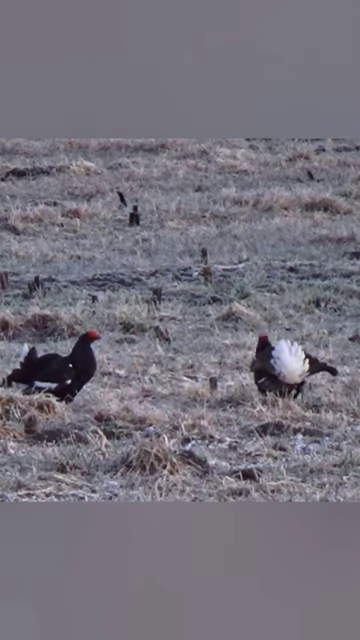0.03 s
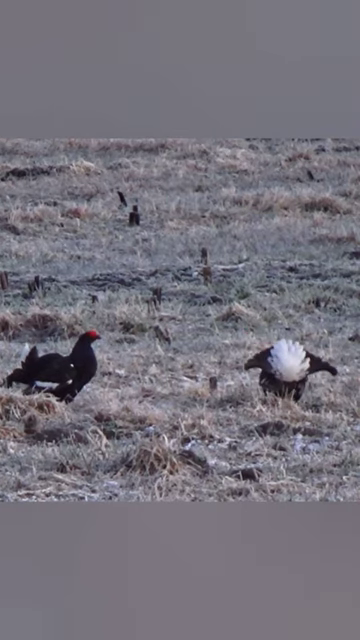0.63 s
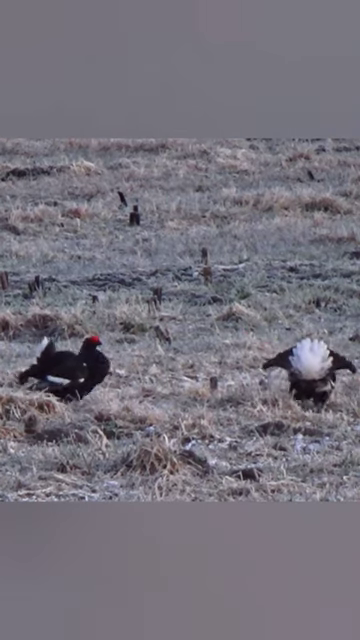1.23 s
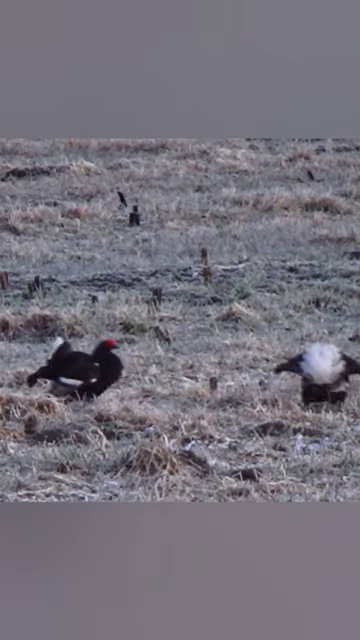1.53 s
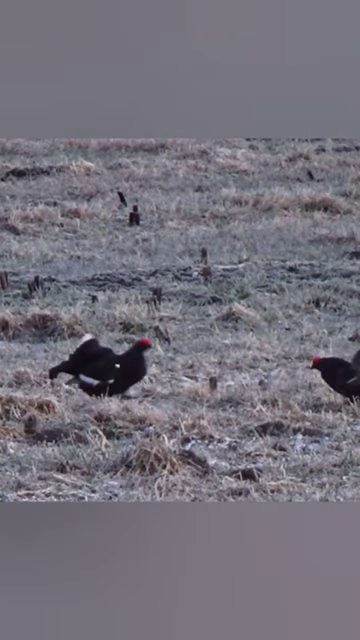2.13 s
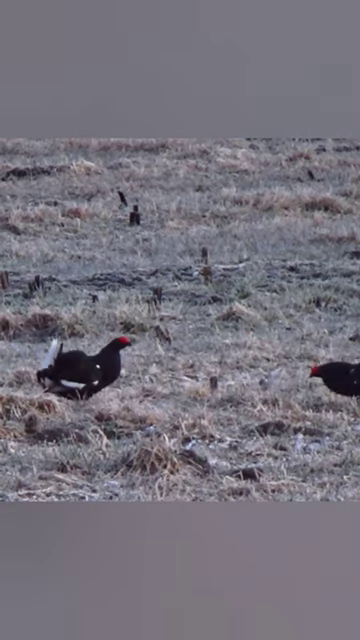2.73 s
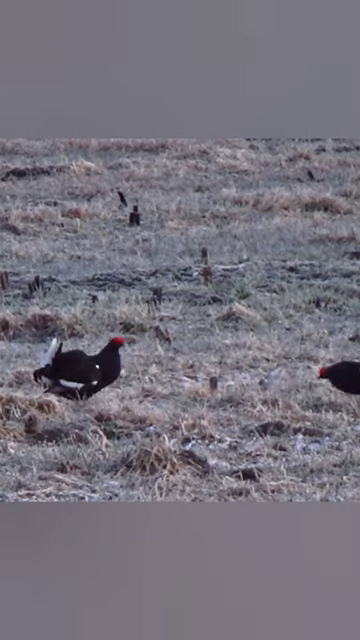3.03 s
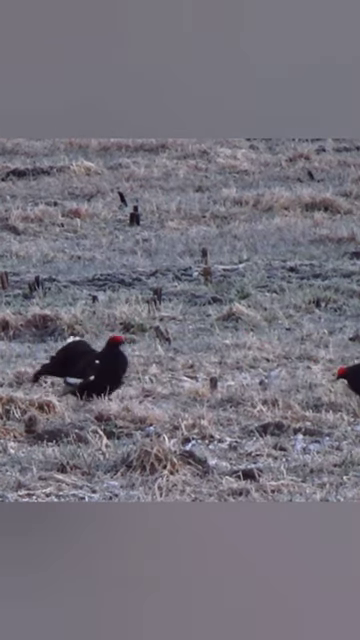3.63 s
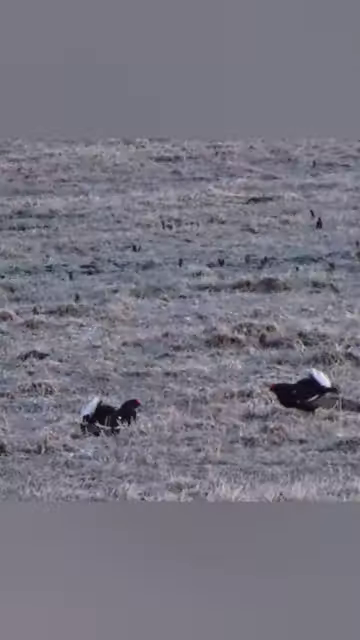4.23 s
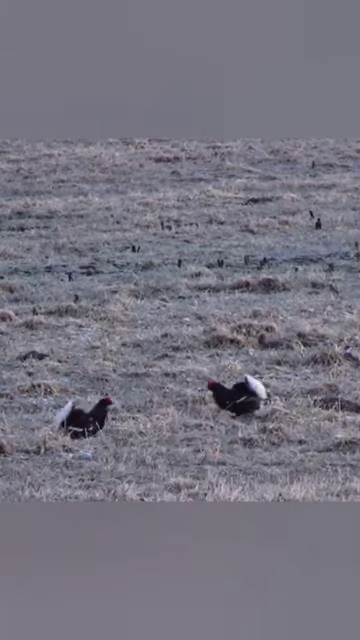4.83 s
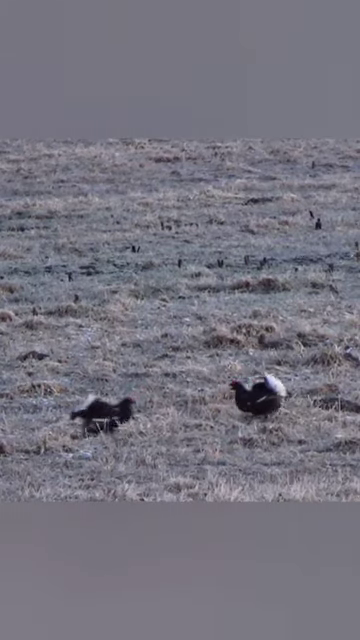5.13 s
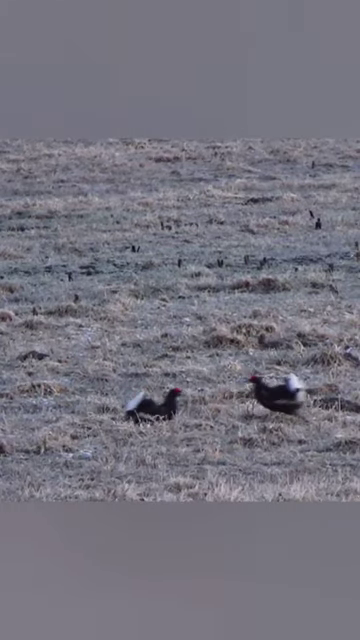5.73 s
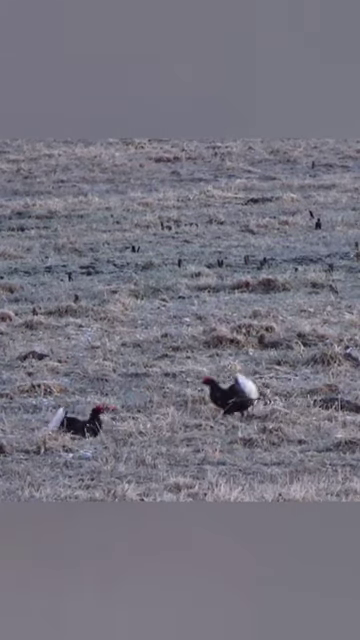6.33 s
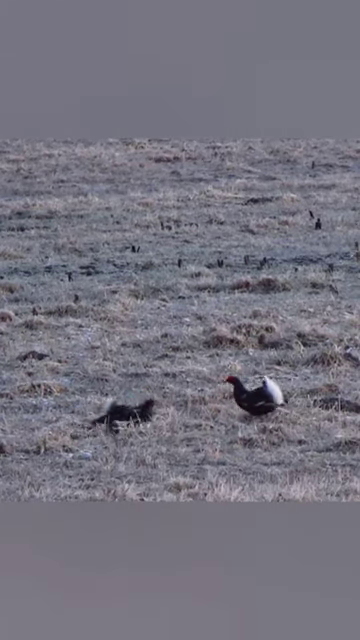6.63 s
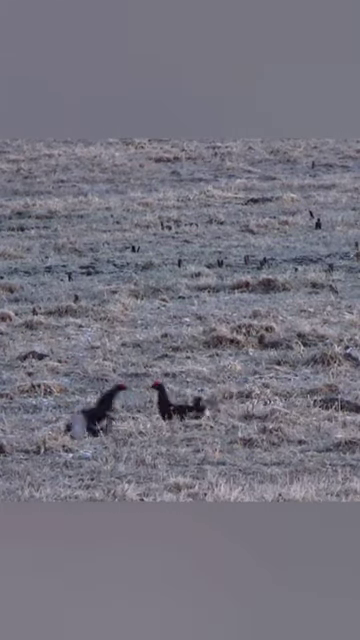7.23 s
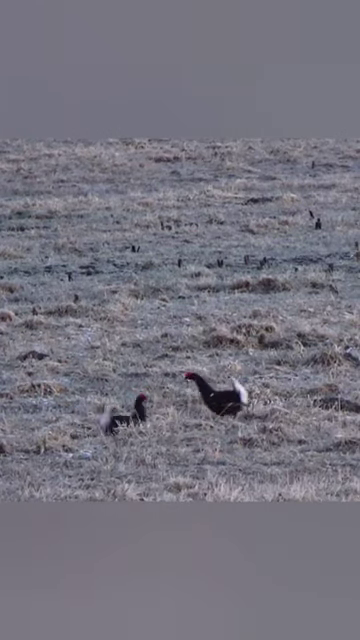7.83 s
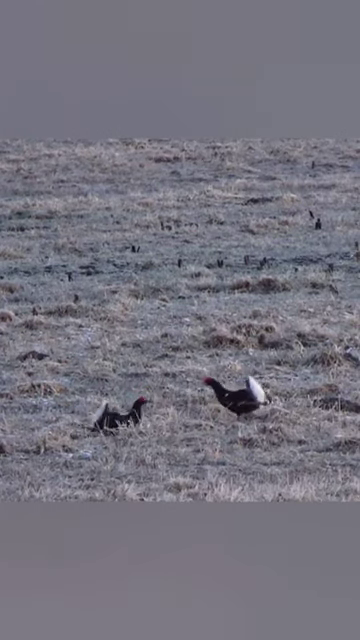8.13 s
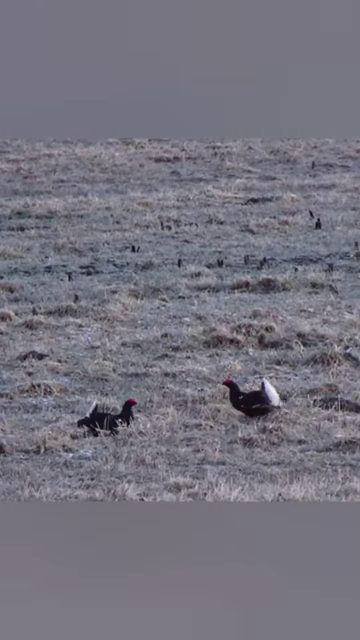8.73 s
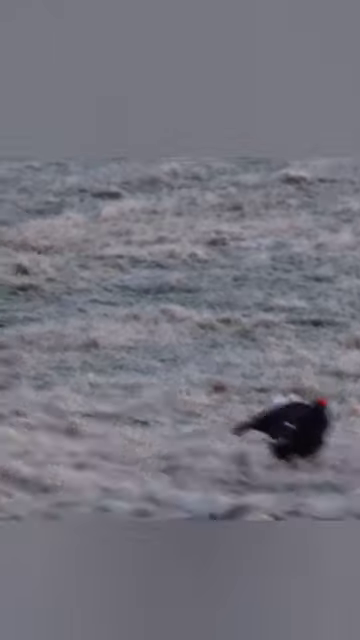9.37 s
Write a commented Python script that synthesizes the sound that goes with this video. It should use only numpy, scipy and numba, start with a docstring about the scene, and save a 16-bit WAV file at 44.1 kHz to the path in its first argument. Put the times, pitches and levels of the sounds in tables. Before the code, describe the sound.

A male grouse coos close by on an open field, his quick, low, falling notes bubbling up in three swelling runs that begin at about 0, 3.2 and 6.5 seconds. Each closes with a short cadence and a trilling flourish. Rivals coo and hoot further off throughout, over soft still air, faint songbird chirps and small ticks of frozen grass. For the first four seconds a distant bird repeats a quavering whistle that flicks upward at the end. A breathy hiss runs from about 1.7 to 2.8 seconds. A faint nasal whine comes between 4 and 6 seconds, then a louder, harsher hiss from 7 to 7.6. Around 8 seconds wings flap near the microphone with soft thumps and feathery swishes, and from 8.2 to 9 a loud, rasping whine breaks over the last flourish.

```python
"""Black grouse on a frosty field, from one microphone near a displaying cock, with rivals further off.
From the start he bubbles: quick falling notes swell through his air sac, each of three runs closing in a
cadence and a flourish. Frozen grass ticks, and for four seconds a distant bird repeats a quavering whistle.
Near 2 s air hisses through a throat and beak; a faint nasal whine follows at 4 s, a harsher hiss at 7 s.
Around 8 s wings flap close by, and the whine returns, loud and rasping, over the last flourish."""
import sys
import numpy as np
from scipy import signal
from scipy.fft import rfft, irfft
from scipy.io import wavfile
from scipy.ndimage import uniform_filter1d, map_coordinates
from numba import njit

SR = 44100
rng = np.random.default_rng(int(sys.argv[2]) if len(sys.argv) > 2 else 0)


def materialize(psi):
    """Save the field psi as 16-bit PCM at rate SR to the path in sys.argv[1].

    A 1-D psi becomes a single channel; in a 2-D psi each row is a channel.
    """
    bounded = np.clip(np.atleast_2d(psi).T, -1, 1)
    quanta = np.round(bounded * 32767).astype(np.int16)
    wavfile.write(sys.argv[1], SR, quanta)


N = 418950
TIME = np.arange(N) / SR


def undb(db):
    return 10 ** (np.asarray(db) / 20)


def unit(x):
    """Scale to rms 1."""
    return x / np.sqrt(np.mean(x ** 2) + 1e-18)


def add(out, start_s, x):
    """Mix x into out from a given time."""
    i = int(round(start_s * SR))
    a, b = max(i, 0), min(i + len(x), N)
    if b > a:
        out[a:b] += x[a - i:b - i]


def walk(rate):
    """A smooth random curve with rms 1 and about rate turns a second."""
    knots = rng.standard_normal(N // 8)
    return unit(map_coordinates(knots, [TIME * rate], order=2, mode="wrap"))


def colour(x, points):
    """Filter by a spectrum of (Hz, dB) points."""
    hz, db = np.transpose(points)
    f = np.arange(N // 2 + 1) * SR / N
    return irfft(rfft(x) * undb(np.interp(np.log(f + 1), np.log(hz), db)), N)


def noise(points):
    """Noise of a given spectral shape, rms 1."""
    return unit(colour(rng.standard_normal(N), points))


@njit
def bandpass(x, hz, width_hz):
    """State-variable band-pass with a moving centre."""
    y, band, low = np.empty(len(x)), 0., 0.
    for i in range(len(x)):
        g, damping = np.tan(np.pi * hz[i] / SR), width_hz / hz[i]
        v = (band + g * (x[i] - low)) / (1 + g * (g + damping))
        band, low, y[i] = 2 * v - band, low + 2 * g * v, damping * v
    return y


def resonance(hz, width_hz):
    """Turbulent air in a steep resonance, rms 1."""
    hz, width_hz = hz + np.zeros(N), float(width_hz)
    return unit(bandpass(bandpass(rng.standard_normal(N), hz, width_hz), hz, width_hz))


def tone(hz):
    """A sine that follows a pitch curve."""
    return np.sin(2 * np.pi * (np.cumsum(hz) / SR + rng.random()))


def swell(crest_s, attack_s, release_s):
    """A bell-shaped envelope with its own rise and fall."""
    t = TIME - crest_s
    return np.exp(-np.minimum((t / np.where(t < 0, attack_s, release_s)) ** 2, 60))


def held(start_s, end_s, edge_s):
    """An envelope that opens, holds and closes."""
    return np.clip(np.minimum(TIME - start_s, end_s - TIME) / edge_s, 0, 1)


def bursts(times, dbs, rise_s):
    """An envelope that swells and dies away at each time."""
    out, t = np.zeros(N), np.arange(SR // 5) / SR / rise_s
    for s, db in zip(times, dbs):
        add(out, s, undb(db) * t * np.exp(1 - t))
    return out


def field(x, wet_db, t60_s):
    """The direct sound plus thin, dull scatter from tussocks and the far edge of the field."""
    tail = rng.standard_normal(N) * undb(-60 * TIME / t60_s) * (TIME > .02)
    tail = colour(tail / np.sqrt(np.sum(tail ** 2)), [(500, 4.5), (3000, 4), (10000, -14.5)])
    return x + undb(wet_db) * signal.fftconvolve(x, tail[:SR])[:N]


# Still air over the field: (frequency [Hz], relative level [dB])
AIR_SPECTRUM = [(30, -14), (70, -10.5), (300, 8), (700, -2.5), (1100, -14.5), (2000, -12), (4200, -18.5),
                (6500, -17.5), (9000, -21), (11000, -24.5), (15000, -28.5)]
# A far rush, probably other cocks hissing: (time [s], level [dB])
FAR_RUSH = [(1.2, -73.5), (3, -60.5), (5.5, -63)]

def ambience(air_db=-49, rumble_db=-61, shimmer_db=-69, flutter_db=3.5, flutter_hz=20):
    """Still air under an uneven low rumble, far hissing and a shimmer of distant birds."""
    def wavering(db):
        return undb(db + flutter_db * walk(flutter_hz))
    rush = wavering(np.interp(TIME, *np.transpose(FAR_RUSH))) * resonance(735, 150)
    air = undb(air_db) * noise(AIR_SPECTRUM)
    rumble = wavering(rumble_db) * resonance(95, 130)
    shimmer = wavering(shimmer_db) * resonance(2700, 1600)
    return air + rumble + rush + shimmer


def twitter(count=130, db=-63, middle_s=5.1, spread_s=0.5, hz=3200, spread_hz=280, scatter_db=3.5):
    """A far songbird's grainy patter of very short notes, coming and going."""
    out, window = np.zeros(N), np.hanning(1600)
    for when, pitch, size in rng.standard_normal((count, 3)):
        note = window * tone(np.full(len(window), hz + spread_hz * pitch))
        add(out, middle_s + spread_s * when, undb(db + scatter_db * size) * note)
    return out


# Slurred songbird notes that carry to the microphone: (time [s], pitch [Hz])
CLEAR_CHIRPS = [(.02, 2880), (.28, 2880), (.359, 2543), (0.472, 2980), (0.529, 2000), (0.74, 3030),
                (0.809, 2630), (.9, 3050)]

def songbirds(faint_count=70, clear_db=-55, faint_db=-64, arch_hz=240):
    """Arched chirps from across the field, a few clear and many faint."""
    out, along = np.zeros(N), np.linspace(-1, 1, 5200)
    clear = [(s, hz, clear_db) for s, hz in CLEAR_CHIRPS]
    faint = [(when * N / SR, 2100 + 1100 * pitch, faint_db)
             for when, pitch in rng.random((faint_count, 2))]
    for s, hz, db in clear + faint:
        chirp = np.hanning(len(along)) * tone(hz - arch_hz * along * (along + .5))
        add(out, s - len(chirp) / SR / 2, undb(db) * chirp)
    return out


# A distant bird's whistles:
# (start [s], upswing start [s], pitch [Hz], relative level [dB], gain over the upswing [dB])
FAR_WHISTLES = [(-.3, 0.206, 1754, -52.5, -2), (0.391, 0.892, 1750, -52.5, 0), (1.059, 1.55, 1743, -52, 5),
                (1.695, 2.205, 1732, -53.5, -14), (2.359, 2.831, 1757, -52.5, -4),
                (2.996, 3.456, 1758, -46.5, -3.5), (3.613, 4.072, 1785, -47.5, -7.5)]

def whistler(quaver_hz=17.4, depth_hz=62, scoop_hz=150, scoop_s=0.14, upswing_hz=540, upswing_s=0.03,
             waver_db=2.1):
    """Each whistle scoops up, quavers, and flicks upward at the end."""
    out = np.zeros(N)
    for start, turn, hz, db, flick_db in FAR_WHISTLES:
        t = np.arange(int((turn + upswing_s - start) * SR)) / SR + start
        settled = np.minimum((t - start) / scoop_s, 1)
        flick = np.maximum(t - turn, 0) / upswing_s
        scoop = scoop_hz * (1 - settled) ** 1.8
        quaver = -depth_hz * settled ** 3 * np.cos(2 * np.pi * quaver_hz * np.minimum(t - turn, 0))
        pitch = hz - scoop + quaver + upswing_hz * flick ** 0.59 + 10 * walk(30)[:len(t)]
        envelope = np.minimum((t - start) / 0.0049, 1) * (1.3 + 0.13 * settled) * (1 - flick ** 3)
        level_db = db + flick_db * np.sqrt(flick) + waver_db * walk(35)[:len(t)]
        add(out, start, np.sqrt(2) * undb(level_db) * envelope * tone(pitch))
    return out


def far_cocks(count=330, db=-26, hz=470, spread_hz=40, scatter_db=2.5):
    """The rest of the lek, far out on the field: weak, overlapping coos."""
    out = np.zeros(N)
    for k, (late, pitch, size) in enumerate(rng.standard_normal((count, 3))):
        sac_hz = hz + spread_hz * np.clip(pitch, -1.6, 1.6)
        note = coo(sac_hz, swell_s=0.013, fall_s=0.029, sink_hz=19.45, end_hz=sac_hz - 70, tail_db=-6)
        crest_s = (k + late / 2) / count * N / SR
        add(out, crest_s - len(note) / SR / 2, undb(db + scatter_db * min(size, 1)) * note)
    return out


# Rivals further off strike up a phrase of high hoots: (time [s], level [dB])
RIVAL_PHRASES = [(.229, -21.5), (.435, -19.5), (3.129, -23), (3.452, -18.5), (6.489, -20)]
# The phrase, a steep swoop, an arch and lesser swoops:
# (delay [s], relative level [dB], pitch [Hz], fall [Hz/s], arch [Hz])
HOOT_PHRASE = [(0, -1, 560, 5520, 0), (.078, -3, 564.6, 300, 43), (.475, -7, 549, 4600, 0.5),
               (.812, -3, 534, 3230, 3)]

def rival_hoots(attack_s=0.012, release_s=0.02):
    """Short notes that sweep down from above the air sac's resonance, or arch over it."""
    out, t = np.zeros(N), np.arange(-2000, 2000) / SR
    envelope = np.exp(-(t / np.where(t < 0, attack_s, release_s)) ** 2)
    for start_s, rival_db in RIVAL_PHRASES:
        for s, db, hz, fall_hz_per_s, arch_hz in HOOT_PHRASE:
            pitch = hz - fall_hz_per_s * t - arch_hz * (t / release_s) ** 2
            add(out, start_s + s + t[0], undb(rival_db + db) * envelope * tone(pitch))
    return out


# Dry ticks on the field: (time [s], level [dB])
DRY_TICKS = [(.84, -52), (.925, -52), (1.194, -50), (3.141, -51), (4.12, -51), (4.213, -47), (4.315, -52),
             (4.389, -51), (4.556, -50), (4.921, -50), (5.79, -50), (7.252, -50)]

def dry_ticks():
    """Small dry ticks, probably frozen stalks snapping."""
    return bursts(*np.transpose(DRY_TICKS), rise_s=0.0022) * resonance(3250, width_hz=1900)


# Steps in frozen grass: (time [s], level [dB])
GRASS_STEPS = [(1.662, -41), (1.679, -41.5), (3.185, -49), (4.213, -49), (4.698, -46), (6.808, -48),
               (6.822, -44), (7.011, -53), (7.06, -51), (8.812, -41)]
# The birds brush through the grass: (time [s], half length [s], level [dB])
GRASS_BRUSHES = [(1.25, 0.056, -69), (3.145, 0.072, -63), (3.419, 0.1, -63), (4.61, 0.17, -64.5),
                 (7.005, 0.54, -66.5)]
# Frozen blades: (frequency [Hz], relative level [dB])
GRASS_SPECTRUM = [(1000, -20.5), (3000, -12.5), (5500, 0), (8500, 0.5), (11000, -16), (15000, -26)]

def grass(tick_count=130, tick_db=-65, spread_db=1.5, crackle_db=-7, grain_db=3, patchy_db=2.5):
    """Clear steps, each wrapped in a soft rustle, longer brushes, and many tiny ticks of frozen blades."""
    steps = bursts(*np.transpose(GRASS_STEPS), rise_s=0.0015)
    rustle = 0.82 * uniform_filter1d(steps, size=6000)
    when, softness = rng.random((tick_count, 2)).T
    ticks = bursts(when * N / SR, tick_db - spread_db * np.log(softness + 0.08), rise_s=0.0035)
    brushes = sum(undb(db) * swell(s, half_s, half_s) for s, half_s, db in GRASS_BRUSHES)
    blades = (steps + ticks + brushes + rustle) * noise(GRASS_SPECTRUM)
    grain = undb(grain_db * walk(900) + patchy_db * walk(90))
    crackle = undb(crackle_db) * (ticks + brushes) * resonance(2900, width_hz=2200)
    return blades * grain + crackle


# Wing strokes near the microphone: (time [s], thump [dB], feather swish [dB])
WING_STROKES = [(1.722, -49, -50), (7.955, -35, -41), (8.01, -34, -41), (8.073, -31, -36.5),
                (8.112, -34, -42), (8.156, -34.5, -36), (8.208, -37.5, -44.5), (8.519, -33.5, -55),
                (8.614, -30, -46), (8.703, -30.5, -41)]
# Brushing feathers: (frequency [Hz], relative level [dB])
FEATHER_SPECTRUM = [(300, -6), (1500, 5), (3000, -6), (6500, -10), (10000, -25.5), (15000, -44)]

def wings():
    """Each stroke pushes a puff of air and brushes the feathers."""
    s, thump_db, swish_db = np.transpose(WING_STROKES)
    puff = noise([(20, -21), (45, -8), (80, -2), (150, -10.5), (300, -20.5), (1000, -62)])
    thumps = bursts(s, thump_db, rise_s=0.011) * puff
    return thumps + bursts(s, swish_db, rise_s=0.01) * noise(FEATHER_SPECTRUM)


# Two whining calls, one faint and one loud:
# (start [s], end [s], start pitch [Hz], end pitch [Hz], level [dB], roughness [0-1])
WHINE_SYLLABLES = [(4.22, 4.609, 1440, 1380, -54.5, 0.1), (5.098, 5.298, 1360, 1160, -52, 0.52),
                   (5.34, 5.597, 1170, 1410, -54.5, 0.56), (5.601, 5.952, 1440, 1660, -59.5, 0.93),
                   (8.219, 8.339, 1340, 1130, -20.5, 0.52), (8.345, 8.406, 1213, 1190, -20.5, 0.2),
                   (8.404, 8.435, 1147, 1080, -33, 0.87), (8.456, 8.545, 1180, 1030, -33, 0.82),
                   (8.554, 8.64, 1150, 1090, -26, 0.66), (8.645, 8.69, 1190, 1193, -21.5, 0.45),
                   (8.681, 8.813, 1130, 1190, -28, 0.76), (8.803, 8.905, 1250, 1480, -30, 0.94),
                   (8.901, 8.984, 1420, 1360, -21.5, 0.32)]

def syllables(arch_hz=50, arch_db=5, edge_s=0.013):
    """Strength, pitch and roughness of the whine: each syllable is an arch on a glide."""
    strength, hz, rough = np.zeros((3, N))
    for start, end, start_hz, end_hz, db, roughness in WHINE_SYLLABLES:
        along = np.clip((TIME - start) / (end - start), 0, 1)
        arch, begun = np.sin(np.pi * along), TIME >= start
        level_db = db + arch_db * (1.5 - roughness) * (arch - 1)  # clear syllables arch the most
        strength = np.maximum(strength, held(start, end + edge_s, edge_s) * undb(level_db))
        hz = np.where(begun, start_hz + (end_hz - start_hz) * along + arch_hz * arch, hz)
        rough = np.where(begun, roughness, rough)
    return [uniform_filter1d(control, size=300) for control in (strength, hz, rough)]


# The throat's rasp, in whines and hisses alike: (frequency [Hz], relative level [dB])
RASP_SPECTRUM = [(600, -28), (1500, 12), (2200, 1.5), (3900, -14), (4800, -8.5), (5600, -17), (7500, -22),
                 (12000, -39.5)]

def whines(jitter=0.087, shake_db=4, rasp_db=-6, rasp_floor=0.16, rattle_db=1.5):
    """A nasal tone that breaks into a rasp as its pitch and strength start to shake."""
    strength, hz, rough = syllables()
    pitch = hz * (1 + jitter * rough * walk(420) + .01 * walk(76))
    voice = np.sqrt(2) * tone(pitch)
    shake = undb(shake_db * rough * (np.tanh(walk(190)) * 2 ** .5 + 0.5))
    rasp = (rough ** 3 + rasp_floor) * noise(RASP_SPECTRUM) * undb(rasp_db + rattle_db * walk(300))
    return strength * (voice * shake + rasp)


# The wheeze inside the second hiss: (time [s], centre [Hz], level [dB])
WHEEZE_PATH = [(7.015, 1450, -34), (7.05, 1920, -41), (7.071, 2600, -56), (7.12, 2450, -51.5),
               (7.18, 2570, -54.5), (7.29, 2320, -54)]

def wheeze(width_hz=170):
    """A thin resonance that flicks upward as the throat narrows."""
    s, hz, db = np.transpose(WHEEZE_PATH)
    envelope = held(s[0], s[-1], edge_s=.01) * undb(np.interp(TIME, s, db))
    return envelope * resonance(np.interp(TIME, s, hz), width_hz)


# The beak stands open: (start [s], end [s], level [dB])
BEAK_OPENINGS = [(1.676, 1.777, -47.5), (1.78, 2.3, -67.5), (2.256, 2.728, -52), (7.345, 7.58, -53.5),
                 (8.215, 8.43, -56), (8.46, 8.8, -61)]

def beak(overtone_db=-10):
    """Air sings in two high resonances of the open beak."""
    opening = sum(undb(db) * held(start, end, edge_s=0.071) for start, end, db in BEAK_OPENINGS)
    return opening * (resonance(4650, width_hz=700) + undb(overtone_db) * resonance(5750, width_hz=220))


# The long, soft stream of air under each hiss: (start [s], end [s])
AIR_STREAMS = [(1.78, 2.76), (6.925, 7.64)]
# Pushes of air on the throat's two resonances:
# (crest [s], attack [s], release [s], lower [Hz], its level [dB], upper [Hz], its level [dB])
AIR_PUSHES = [(1.722, 0.023, 0.011, 1690, -36, 1775, -36), (1.81, 0.029, 0.081, 976, -62, 2350, -57),
              (2.33, 0.084, 0.21, 1155, -41, 1960, -53.5), (2.6, 0.1, 0.14, 1060, -59, 1980, -50),
              (6.945, 0.022, 0.053, 1763, -20.5, 2164, -31.5), (7.34, 0.085, 0.034, 890, -41, 2340, -42.5),
              (7.41, 0.04, .055, 924, -63, 2310, -31.5), (7.49, 0.02, 0.022, 1187, -69, 2690, -33),
              (7.565, 0.03, 0.085, 1725, -53, 3140, -51)]

def throat_resonance(push_hz, push_db, rest_hz, rest_db, follow=0.63, lead_s=.025):
    """Centre and gain of a throat resonance: each push draws it from rest, a little ahead of the air."""
    flowing = sum(1. * ((TIME > start) & (TIME < end)) for start, end in AIR_STREAMS)
    stream = np.abs(uniform_filter1d(flowing, size=1500))
    timings = [push[:3] for push in AIR_PUSHES]
    effort = np.array([swell(*timing) for timing in timings])
    pull = np.array([swell(crest, max(attack, 2 * lead_s), release) ** follow
                     for crest, attack, release in timings])
    hz = rest_hz + (push_hz - rest_hz) @ pull / np.maximum(pull.sum(axis=0), 1)
    return hz, undb(rest_db) * stream + undb(push_db) @ effort


# Harsh sprays in the second hiss and at the end of the loud whine: (time [s], half length [s], level [dB])
AIR_SPRAYS = [(6.955, 0.048, -39), (7.568, 0.057, -39), (8.875, .05, -38), (8.979, 0.039, -40.5)]
# Spraying air: (frequency [Hz], relative level [dB])
SPRAY_SPECTRUM = [(900, -24.5), (1600, 5), (3400, -3.5), (4300, -10.5), (6300, -15), (8000, -23),
                  (15000, -37.5)]

def hisses(rasp_db=-12, rattle_db=1.47):
    """Air forced through two moving throat resonances and the beak, rattling and spraying as it goes."""
    *_, low_hz, low_db, high_hz, high_db = np.transpose(AIR_PUSHES)
    low_hz, low_gain = throat_resonance(low_hz, low_db, rest_hz=820, rest_db=-52)
    high_hz, high_gain = throat_resonance(high_hz, high_db, rest_hz=2480, rest_db=-71.5)
    throat = low_gain * resonance(low_hz, width_hz=230) + high_gain * resonance(high_hz, width_hz=400)
    breath = throat + beak() + undb(rasp_db) * high_gain * noise(RASP_SPECTRUM)
    spraying = sum(undb(db) * swell(s, half_s, half_s) for s, half_s, db in AIR_SPRAYS)
    breath += spraying * noise(SPRAY_SPECTRUM) + wheeze()
    return breath * undb(rattle_db * (walk(260) - 2.5))  # the rattle also lowers the whole hiss


def coo(hz, swell_s, fall_s, sink_hz, end_hz, tail_db, release_s=0.008):
    """A note swells while sinking onto the air sac's resonance, drops below it and leaves the sac ringing."""
    glide_s, foot, ring_db, ring_s = 0.0251, 0.03, -21, 0.084
    t = np.arange(int(.2 * SR)) / SR - .1  # the crest is at zero
    before, after = np.maximum(-t, 0), np.maximum(t, 0)
    fallen = after / fall_s
    drop = 0.87 * np.tanh(1.83 * fallen ** 1.243) + 0.2 * np.minimum(fallen, 1.3) ** 3
    pitch = hz + sink_hz * np.tanh(before / glide_s) + (end_hz - hz) * drop
    rise = (1 - foot) * np.exp(-(before / swell_s) ** 2) + foot * np.exp(-(before / swell_s / 2) ** 2)
    body = np.exp(-(after / release_s) ** 2)
    fall = (1 - undb(tail_db)) * body + undb(tail_db) * np.exp(-fallen ** 6)
    ring = undb(ring_db) * (1 - body) * np.exp(-after / ring_s) * (1 - after / t[-1])
    return tone(pitch) * rise * fall + ring * tone(np.full(len(t), hz))


def coo_puffs(voice, puff_db=-41, rush_db=-43, steepness=3.2):
    """At close range the hardest notes carry a faint low puff and a soft rush of air."""
    effort = np.abs(uniform_filter1d(voice ** 2, size=200))
    puff = undb(puff_db) * resonance(110, width_hz=380)
    rush = undb(rush_db) * resonance(820, width_hz=600)
    return (effort / effort.max()) ** steepness * (puff + rush)


# Single notes of the flourish: (delay [s], level [dB], pitch [Hz], swell [s], onset above pitch [Hz])
FLOURISH_ACCENTS = [(0, -6.5, 497, 0.031, -22), (.107, -10, 472, 0.0058, 41), (.544, -8, 430, 0.022, 23.5),
                    (.856, -6.5, 497, 0.0089, 237), (.933, -6.5, 498, .017, -14.5),
                    (1.127, -9, 431, 0.02, 49.5), (1.341, -11.5, 485, 0.013, 147.5)]
# Quick trills between them:
# (delay [s], spacing [s], notes, top level [dB], fade [dB], swell [s], first pitch [Hz], later pitch [Hz])
FLOURISH_TRILLS = [(0.212, .053, 3, -12.5, 0.5, 0.011, 417, 429),
                   (0.357, .044, 3, -11, 13, 0.013, 422.3, 420.4),
                   (.668, .0262, 3, -6.5, 3.5, 0.013, 471, 465.7),
                   (.751, .032, 2, -12.5, 4.5, 0.0085, 460, 452.2),
                   (.976, .047, 2, -9, 1.5, .011, 450, 454), (1.052, 0.043, 2, -14, 7.5, 0.0039, 455, 460)]

def flourish(start_s, stretch, trill_onset_hz=22, trill_crest=0.091):
    """Note rows for the accents and the trills between them; a trill is loudest near its start."""
    notes = list(FLOURISH_ACCENTS)
    for s, spacing_s, count, top_db, fade_db, swell_s, first_hz, later_hz in FLOURISH_TRILLS:
        for k, along in enumerate(np.linspace(0, 1, round(count))):
            db = top_db - fade_db * (along - trill_crest) ** 2
            notes.append((s + k * spacing_s, db, later_hz if k else first_hz, swell_s, trill_onset_hz))
    return [(start_s + stretch * s, *note) for s, *note in notes]


# What follows each run: (cadence time [s], flourish time [s], stretch of the flourish [ratio])
RUN_ENDINGS = [(1.268, 1.733, 1.005), (4.538, 5.004, .998), (7.887, 8.344, 1.0)]
# The three notes of a cadence: (delay [s], level [dB], pitch [Hz], swell [s], onset above pitch [Hz])
CADENCE_NOTES = [(0, -7, 436.2, 0.03, 51.3), (.082, -8, 439.2, 0.026, 73.3), (.138, -9, 440, .011, 70)]

def closing_notes(sac_hz, snap_s=0.011, drop_hz=130):
    """Cadence and flourish coos snap shut, the lower ones dropping less; yields (time, level, sound)."""
    for cadence_s, flourish_s, stretch in RUN_ENDINGS:
        cadence = [(cadence_s + s, *note) for s, *note in CADENCE_NOTES]
        for s, db, hz, swell_s, onset_hz in cadence + flourish(flourish_s, stretch):
            end_hz = hz - drop_hz * min(hz / sac_hz - .6, 1)
            yield s, db, coo(hz, swell_s, snap_s, onset_hz, end_hz, tail_db=-22, release_s=0.0084)


# Soft low notes that lead into a run: (time [s], level [dB], pitch [Hz], swell [s])
LEAD_IN_NOTES = [(3.144, -31.5, 331, 0.015), (6.409, -31, 329, 0.068), (6.49, -26, 395, 0.015)]
# The near cock's runs of bubbles: (start [s], spacing [s], first level [dB], notes)
BUBBLE_RUNS = [(-.06, .0814, -27, 16), (3.211, .0821, -20, 16), (6.567, .0815, -20, 16)]

def near_cock(sac_hz=429.8, top_db=-9.5, crescendo_notes=3.46, swell_range_s=(0.0059, 0.019),
              fall_s=0.034, sink_hz=28, end_hz=295):
    """The cock nearest the microphone bubbles through his air sac in runs that grow louder and broader."""
    out, notes = np.zeros(N), []
    for start_s, spacing_s, first_db, count in BUBBLE_RUNS:
        for k, swell_s in enumerate(np.linspace(*swell_range_s, count)):
            below_top_db = (top_db - first_db) * np.exp(-k / crescendo_notes)
            # softer bubbles trail off in a longer, relatively stronger low tail
            tail_s = fall_s * undb(0.5 * below_top_db)
            tail_db = min(-18 + 0.8 * below_top_db, 0)
            bubble = coo(sac_hz, swell_s, tail_s, sink_hz, end_hz, tail_db)
            notes.append((start_s + k * spacing_s, top_db - below_top_db, bubble))
    notes.extend(closing_notes(sac_hz))
    for s, db, hz, swell_s in LEAD_IN_NOTES:
        notes.append((s, db, coo(hz, swell_s, fall_s, sink_hz, end_hz, tail_db=-1.5)))
    for s, db, note in notes:
        add(out, s - len(note) / SR / 2, undb(db) * note)
    return out


def scene():
    """The lek at one microphone: coos linger over the field, the higher calls die away quickly."""
    voices = near_cock() + rival_hoots()
    cooing = field(voices + far_cocks(), wet_db=-16.5, t60_s=1.0) + coo_puffs(voices)
    calls = field(hisses() + whines() + whistler() + songbirds() + twitter(), wet_db=-21.5, t60_s=0.17)
    return (cooing + calls + wings() + grass() + dry_ticks() + ambience())[None]


def record(dry, top_hz=15500):
    """The recorder cuts the top."""
    return signal.sosfilt(signal.ellip(10, .2, 80, top_hz, fs=SR, output="sos"), dry)


dry = scene()
out = record(dry)
materialize(out)
```